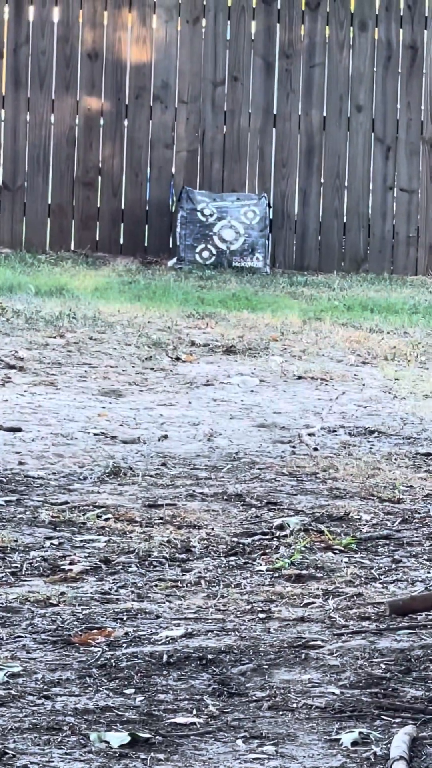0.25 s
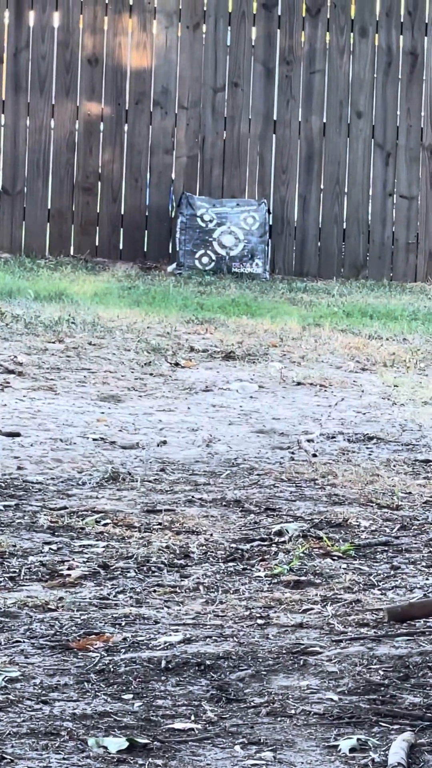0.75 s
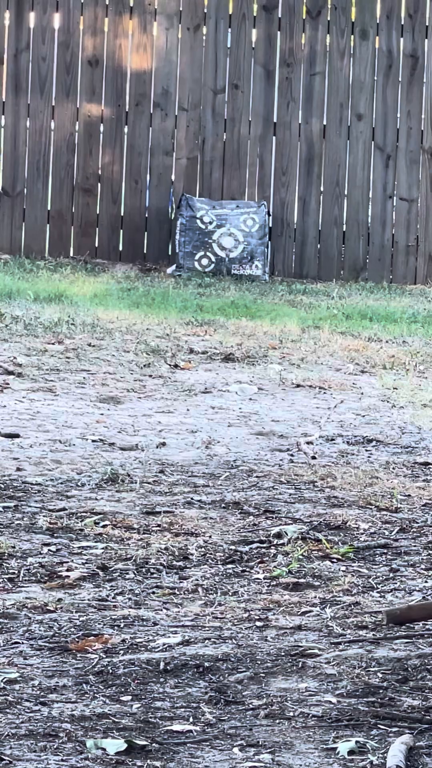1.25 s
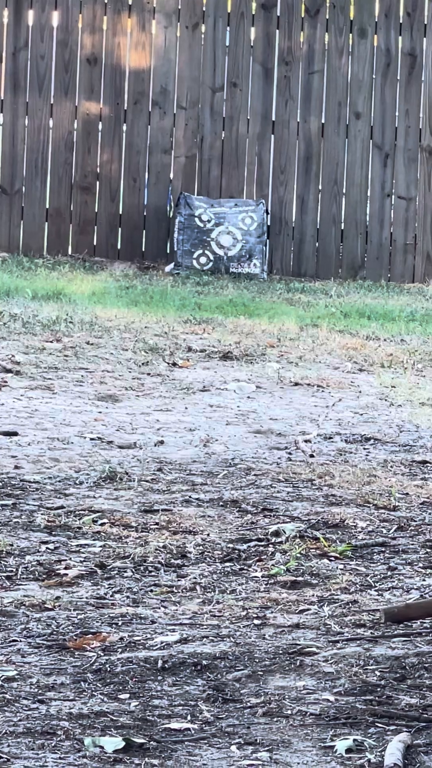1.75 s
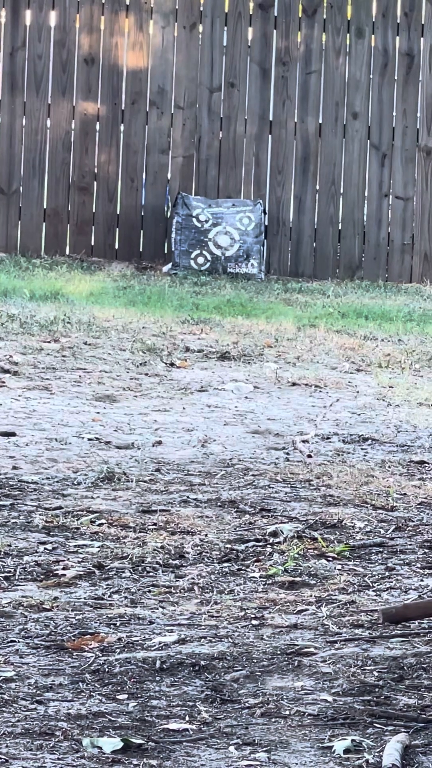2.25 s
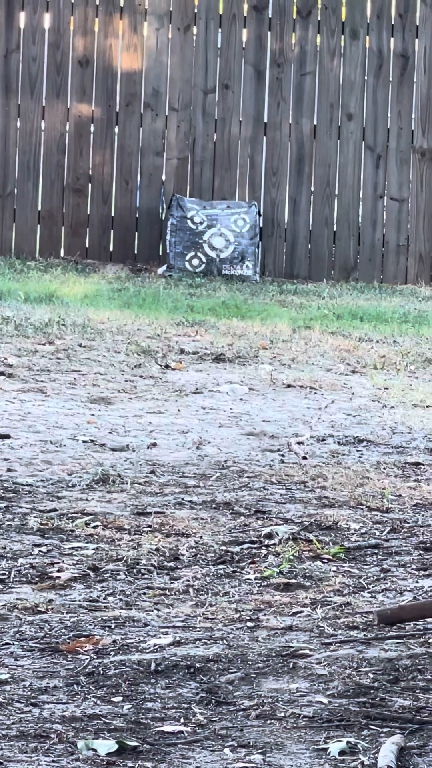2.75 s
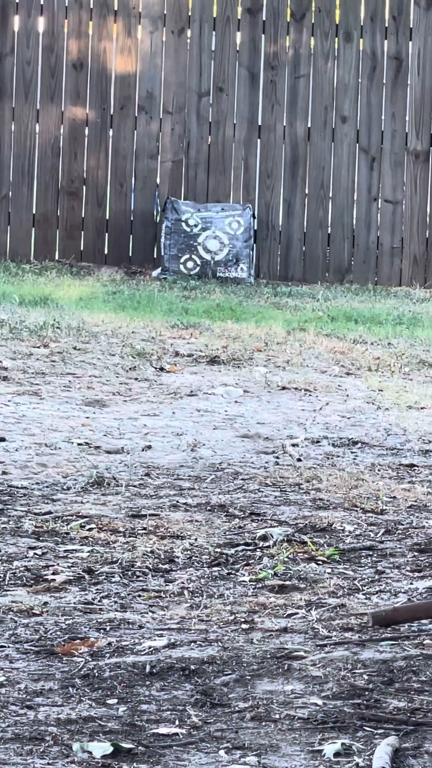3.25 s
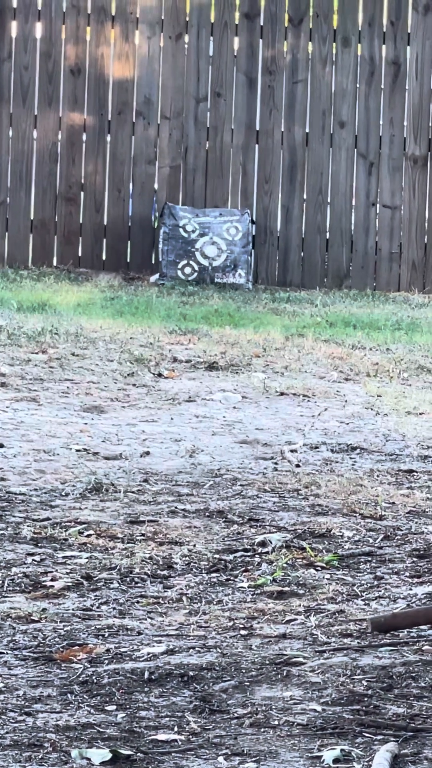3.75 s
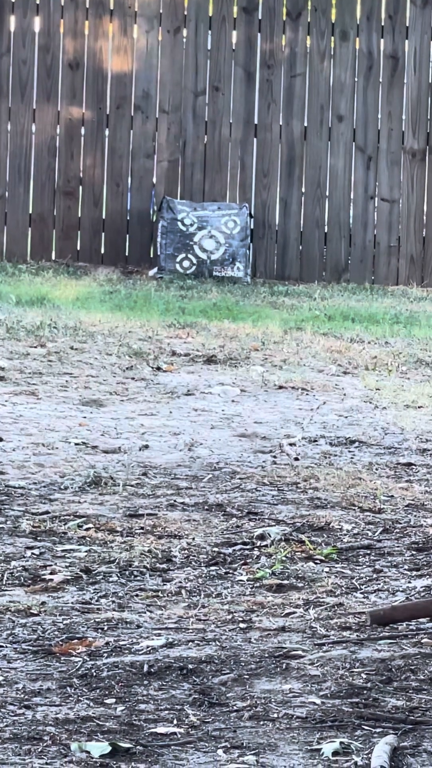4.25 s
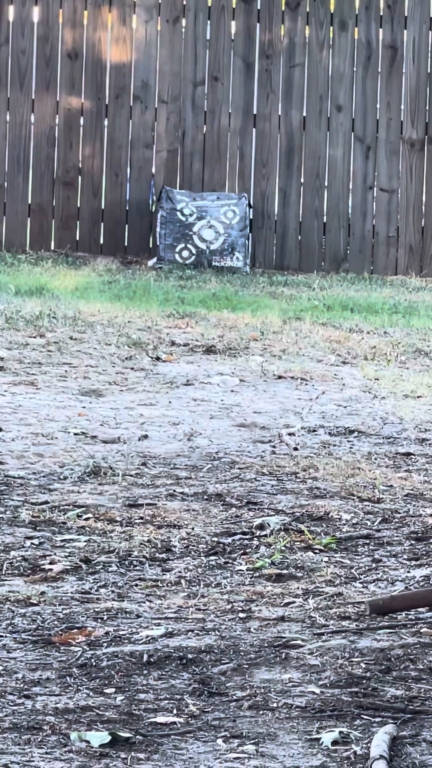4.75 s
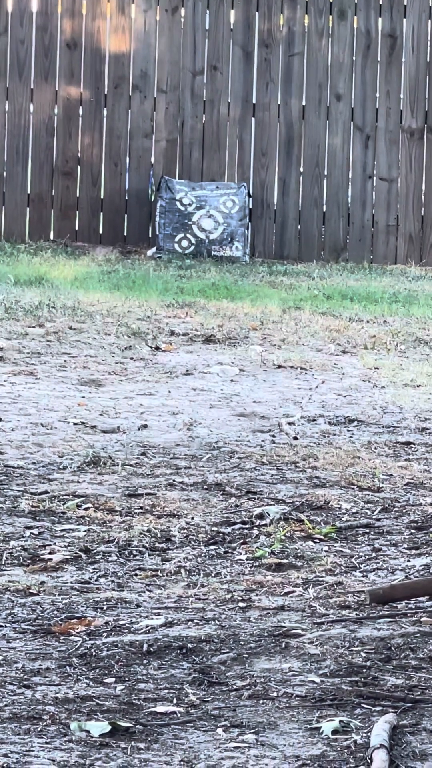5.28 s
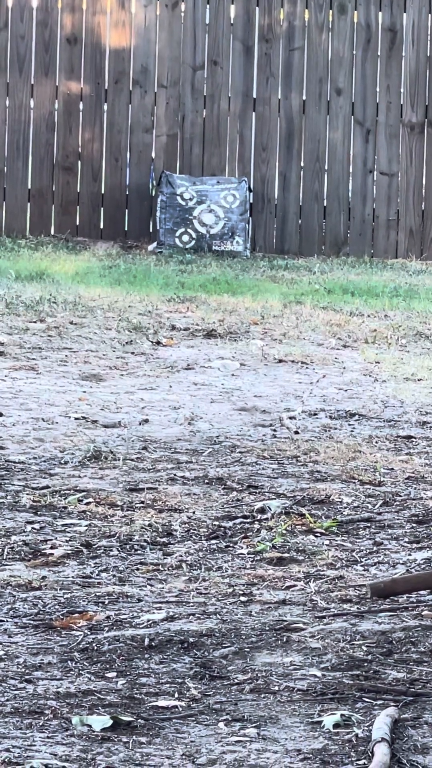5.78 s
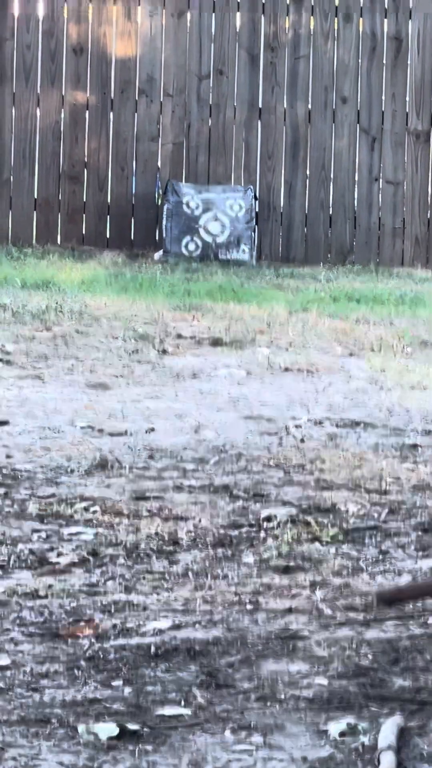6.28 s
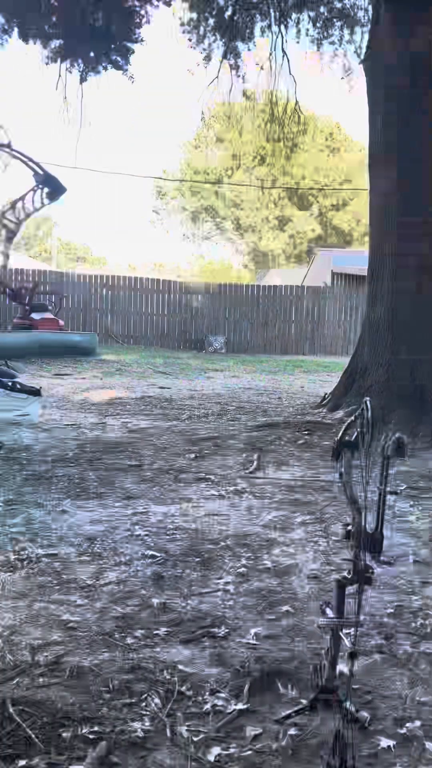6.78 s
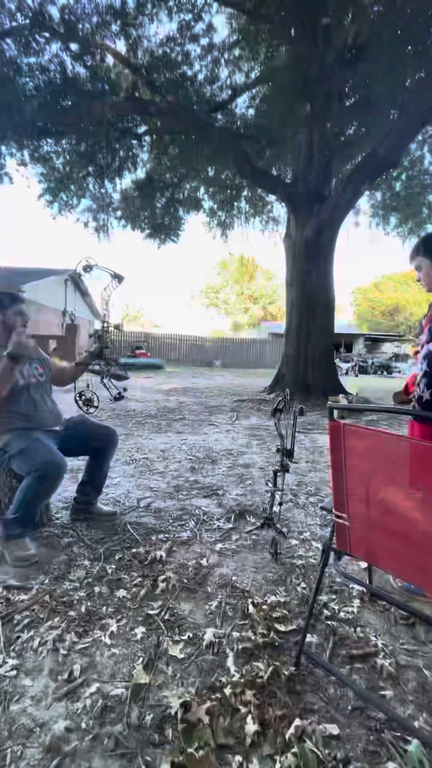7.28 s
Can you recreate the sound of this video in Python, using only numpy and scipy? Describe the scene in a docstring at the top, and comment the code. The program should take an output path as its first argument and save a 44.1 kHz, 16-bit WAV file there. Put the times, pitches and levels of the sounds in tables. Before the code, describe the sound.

Brief, crisp fabric rustles sound close to a phone microphone outdoors, above the low idle of a far engine and a wash of road noise. Midway comes the loudest event: a nearby compound bow cracks, followed almost at once by the arrow's thump in a bag target. Then the engine rises and falls, a twig cracks, fingertips bump the phone, a bird trills very faintly and dry leaves crunch.

```python
"""An eight-cylinder engine rumbles far beyond a back yard, over traffic and faint insects, while clothes
rustle close to the phone. At 3.3 s a compound bow is shot: the release clicks, the string slaps home,
and a quarter second later the arrow thuds into a bag target by a fence. The engine revs once around 5 s.
As it settles a twig snaps, fingertips tap the phone's body, feet shift in dry leaves
and a far bird trills."""
import sys
import numpy as np
from scipy import signal
from scipy.fft import rfft, irfft, next_fast_len
from scipy.io import wavfile
from scipy.ndimage import uniform_filter1d

SR = 44100
rng = np.random.default_rng(int(sys.argv[2]) if len(sys.argv) > 2 else 0)


def file_out(sig):
    """Save sig as 16-bit WAV at sys.argv[1]."""
    # one column per channel
    cols = np.atleast_2d(sig).T
    # limit, then scale
    lim = np.clip(cols, -1, 1)
    pcm = np.round(lim * 32767).astype(np.int16)
    wavfile.write(sys.argv[1], SR, pcm)


N = 331798
TIME = np.arange(N) / SR

# bright tone of rubbing fabric: (frequency [Hz], level [dB])
CLOTH_TONE = [(800, -13), (2000, -5.5), (4000, -11.5), (5000, -13.5), (7000, -7.5), (9000, -1),
              (10300, -1.5), (11300, -6), (12700, -22), (15000, -38.5)]


def undb(db):
    """Decibels to gain."""
    return 10 ** (np.asarray(db) / 20)


def unit(x):
    """Scale to rms 1."""
    return x / np.sqrt(np.mean(x ** 2))


def curves(table):
    """One control curve for each column after the time."""
    s, *columns = np.transpose(table)
    return [np.interp(TIME, s, c) for c in columns]


def gain_at(hz, spectrum):
    """Gain of a (frequency [Hz], level [dB]) spectrum at given frequencies."""
    f, db = np.transpose(spectrum)
    return undb(np.interp(np.log(hz + 1), np.log(f), db))


def colour(x, spectrum):
    """Minimum-phase EQ with the given spectrum; keeps the power of white noise."""
    size = 8192
    gain = unit(gain_at(np.fft.rfftfreq(size, 1 / SR), spectrum))
    cepstrum = irfft(np.log(gain))
    fold = 1 + np.sign(np.fft.fftfreq(size))
    return signal.oaconvolve(x, irfft(np.exp(rfft(cepstrum * fold))))[:N]


def filtered(x, order, hz, kind="band"):
    """Band-, low- or high-pass filter."""
    return signal.sosfilt(signal.butter(order, hz, kind, fs=SR, output="sos"), x)


def noise():
    """White noise."""
    return rng.standard_normal(N)


def walk(rate):
    """Smooth random wander of rms 1, with rate new values a second."""
    k = int(SR / rate)
    steps = np.repeat(rng.standard_normal(N // k + 1), k)
    return unit(uniform_filter1d(uniform_filter1d(steps, k), k)[:N])


def tone(hz):
    """A sine that follows a pitch curve."""
    return np.sin(2 * np.pi * np.cumsum(hz) / SR)


def impulse(s):
    """One instantaneous push at time s."""
    return np.bincount([int(s * SR)], minlength=N).astype(float)


def fade(s, t60):
    """Exponential decay that starts at time s."""
    return (TIME >= s) * undb(-60 * np.clip((TIME - s) / t60, 0, 4))


def delay(x, s):
    """The same sound s seconds later."""
    return np.r_[np.zeros(int(s * SR)), x][:N]


def ring(s, modes):
    """Damped modes struck at time s; neighbours swing in opposite directions."""
    return sum((-1) ** k * undb(db) * fade(s, t60) * np.sin(2 * np.pi * hz * (TIME - s))
               for k, (hz, db, t60) in enumerate(modes))


def spread(mid, side, width):
    """Mid and side to stereo; the microphone ports differ most in the midrange."""
    side = filtered(side, 2, [600, 1500]) + 0.34 * side
    return mid + width * side * np.array([[1], [-1]])


def engine(waver=.005, flutter_db=1.75, burble_db=-7, burble_flutter_db=3, rough_db=-1):
    """Orders of the engine cycle beat against each other over a rough exhaust rumble."""
    # idle and one rev: (time [s], cycle rate [Hz], 5th order [dB], firing 8th [dB], 10th order [dB])
    running = [(0, 9.65, -44, -30, -48), (.3, 9.74, -41, -35, -35), (.6, 9.89, -43, -35, -34),
               (.85, 10.05, -37, -31, -30), (1.15, 10.19, -37, -30, -26), (1.5, 10.11, -39, -28, -26),
               (1.8, 10.02, -38, -28, -33), (2.1, 9.79, -40, -33, -34), (2.35, 9.5, -45, -37, -40),
               (2.6, 9.18, -44, -28, -48), (2.85, 9.28, -46, -30, -44), (3.1, 9.6, -41, -32, -41),
               (3.45, 9.6, -42, -42, -36), (3.8, 9.65, -40, -39, -42), (4.55, 9.65, -38, -43, -38),
               (4.68, 12.72, -30, -35, -33), (4.8, 15.3, -33, -21, -36), (4.95, 16.58, -36, -19, -43),
               (5.12, 17.12, -36, -22, -42), (5.4, 16.92, -36, -20, -41), (5.6, 16.72, -35, -20, -41),
               (5.78, 16.37, -34, -19, -48), (5.95, 15.14, -46, -26, -48), (6.1, 14.45, -41, -27, -40),
               (6.28, 13.9, -48, -28, -40), (6.45, 12.11, -42, -37, -50), (6.7, 10.7, -54, -48, -43),
               (7.05, 9.87, -51, -57, -54), (7.5, 9.57, -54, -66, -63)]
    # weaker orders from each bank's uneven firing: (multiple of the cycle rate, level [dB])
    uneven_orders = [(3, 2), (6, -5.5), (7, -2), (9, -6.5), (11, -5.5), (12, -4), (13, -0.5), (14, -2),
                     (15, -4), (16, 1), (18, -5.5), (19, -5.5), (21, -7), (24, -6)]
    # what the exhaust and the distance let through: (frequency [Hz], level [dB])
    exhaust = [(20, -30), (35, -17), (48, -4), (75, 1), (110, 2), (140, -0.5), (170, -10.5), (240, -13),
               (300, -24), (450, -45), (2000, -110)]
    # swell of the exhaust rumble: (time [s], level [dB])
    rumble_envelope = [(0, -38), (1.2, -35.5), (2.3, -34.5), (3.3, -35), (4.5, -38), (4.75, -29),
                       (5.1, -31.5), (5.8, -33.5), (6.3, -34.5), (6.6, -40.5), (7.1, -44.5), (7.52, -54.5)]
    rate, fifth_db, firing_db, tenth_db = curves(running)
    rumble_db, = curves(rumble_envelope)
    turn = 2 * np.pi * np.cumsum(rate * (1 + waver * walk(12))) / SR
    order = lambda k: np.sqrt(2) * np.sin(k * turn + rng.uniform(0, 2 * np.pi))
    strong = [(5, fifth_db), (8, firing_db), (10, tenth_db)]
    drone = sum(order(k) * undb(db + flutter_db * walk(9)) for k, db in strong)
    burble = sum(order(k) * gain_at(k * rate, exhaust) * undb(db + burble_flutter_db * walk(7))
                 for k, db in uneven_orders)
    roughness = undb(rough_db) * colour(noise(), exhaust)
    return drone + undb(rumble_db) * (undb(burble_db) * burble + roughness)


def traffic(swell_db=0.76, whine_hz=850, whine_db=-12, whine_swell_db=3):
    """A wash of far road noise with a wandering tyre whine."""
    # tone of the distant road: (frequency [Hz], level [dB])
    road_tone = [(100, -12.5), (235, 2), (300, -6.5), (370, -4.5), (470, -6), (680, -5), (850, -3),
                 (1150, -8), (1900, -10.5), (2400, -18), (3200, -24.5), (6000, -35), (10300, -38),
                 (12500, -59)]
    # its slow ebb: (time [s], level [dB])
    road_envelope = [(0, -46), (1, -47), (2, -47), (2.8, -49), (3.8, -51.5), (4.5, -51), (5, -48.5),
                     (5.8, -52), (6.4, -52.5), (7, -53.5), (7.52, -54)]
    level_db, = curves(road_envelope)
    wash = spread(colour(noise(), road_tone), colour(noise(), road_tone), width=.38)
    whine = walk(110) * tone(whine_hz * (1 + .04 * walk(2)))
    whine *= undb(whine_db + whine_swell_db * walk(3))
    return undb(level_db + swell_db * walk(6)) * (wash + whine)


def bass_width(db=-57):
    """A faint low rumble, opposite in left and right, that widens the engine."""
    return undb(db) * unit(filtered(noise(), 2, [30, 130])) * np.array([[1], [-1]])


def insects(insect_hz=2620, insect_db=-68, pulse_db=2):
    """A faint far chorus, one narrow band that comes and goes."""
    chorus = walk(420) * tone(insect_hz * (1 + .015 * walk(1.4)))
    presence_db, = curves([(0, -11), (1.8, -3), (3, 1), (4.6, 0.5), (5.8, -3), (6.4, -13.5)])
    return chorus * undb(insect_db + presence_db + pulse_db * walk(8))


def crackle(spectrum, grain_db):
    """Friction as dense tiny slips of very unequal size, 16 samples each."""
    slips = undb(grain_db * np.minimum(rng.exponential(size=N), 5))
    return unit(colour(noise() * np.repeat(slips, 16)[:N], spectrum))


def clothes():
    """Fabric brushes in short strokes, before the shot and after it."""
    # two bouts of movement, each a list of (time [s], level [dB])
    bouts = [
        [(0.4, -80), (0.58, -70), (0.69, -50.5), (0.77, -67), (0.93, -53), (1.11, -71), (1.13, -51.5),
         (1.28, -61), (1.31, -48), (1.32, -58), (1.33, -49), (1.35, -55), (1.39, -52), (1.41, -49), (1.42, -55),
         (1.44, -52), (1.64, -75), (1.7, -54), (1.8, -76), (2.05, -79), (2.15, -62.5), (2.32, -84), (2.41, -45),
         (2.47, -50.5), (2.47, -43.5), (2.49, -54.5), (2.55, -61), (2.56, -50), (2.57, -63), (2.85, -82)],
        [(4.8, -86), (4.814, -84), (5.062, -53.5), (5.088, -39.5), (5.22, -65.5), (5.464, -73.5),
         (5.522, -54.5), (5.604, -50), (5.626, -63), (5.634, -51), (5.642, -57), (5.762, -46.5), (5.848, -67),
         (5.894, -60.5), (5.976, -76.5), (6.032, -57), (6.1, -84), (6.15, -83)],
    ]
    strokes = sum(undb(curves(rows)[0]) * (TIME > rows[0][0]) * (TIME < rows[-1][0]) for rows in bouts)
    return strokes * crackle(CLOTH_TONE, grain_db=3.8)


def ticks(trim_db=-2):
    """Single sharp snaps among the rustle."""
    # tiny noise bursts: (time [s], level [dB], band centre [Hz], t60 [s])
    snaps = [(.9986, -42, 10000, .012), (1.1253, -44, 10000, .03), (1.284, -45, 9000, .015),
             (1.2967, -37, 9000, .06), (1.334, -32, 9000, .025), (1.3623, -35, 10000, .02),
             (1.3728, -34, 10000, .03), (1.3882, -31.5, 9000, .02), (1.421, -31, 9000, .015),
             (2.4094, -38, 10000, .03), (2.4304, -38, 10000, .03), (2.4733, -32, 9000, .012),
             (2.5551, -32.5, 8000, 0.013), (4.241, -49, 7000, .015), (5.0845, -40.5, 10000, .025),
             (5.6341, -39, 9000, .012)]
    bursts = sum(undb(db) * filtered(noise() * fade(s, t60), 1, [hz / 2, hz * 1.4])
                 for s, db, hz, t60 in snaps)
    return undb(trim_db) * colour(bursts, CLOTH_TONE)


def bow(click_db=-12, chatter_db=-25, hook_db=-27, clack_db=-29, limb_db=-29, buzz_db=-26.5):
    """The release snaps open; the string drives the arrow off, slaps its stop and shakes the limbs."""
    # tone of the release click and of the string slap: (frequency [Hz], level [dB])
    click_tone = [(1000, -25), (3000, -22), (4500, -12), (6000, -6), (7500, -5), (8300, 0), (9700, 1),
                  (11300, 2), (13000, -21), (15500, -23)]
    slap_tone = [(300, 1), (700, -11.5), (1200, -8.5), (1900, -8), (2500, -18), (3400, -10), (4400, -7),
                 (6000, -11.5), (7800, -6), (9000, 0.5), (10200, -1.5), (11500, -7.5), (13000, -20),
                 (15500, -34)]
    # the string hits its stop: (time [s], level [dB], t60 [s])
    blows = [(3.3113, -28, .04), (3.3149, -16.5, .03), (3.3176, -20, .055)]
    # ring of release hook, riser and fittings, limbs and string: (frequency [Hz], level [dB], t60 [s])
    hook_modes = [(5879, -12, .029), (7000, -11, .02), (7330, -2, .03), (7740, 12, .03), (7967, -6, .036),
                  (11390, -8, .025)]
    riser_modes = [(716, -3, .16), (1220, -6, .05), (1600, -2, .05), (1950, 0, .07), (2850, -5, .08),
                   (3250, -3, .05), (4300, -4, .04), (5250, -10, .09), (6320, -12, 0.1198),
                   (10372, -11, .2)]
    limb_modes = [(90, 0, .3), (175, -4, .18), (291, -6, .3), (384, -2, .17)]
    # slapback from walls near the archer: (delay [s], level [dB])
    walls = [(0.0166, -21.5), (0.0297, -16), (.107, -28)]
    # tone of the yard's tail and of the rattling fittings: (frequency [Hz], level [dB])
    tail_tone = [(120, -15), (300, 6), (600, 0), (1500, -2), (3500, -3), (6300, 0), (9000, -1),
                 (10500, 2.5), (12000, -9), (14000, -24), (16000, -36)]
    buzz_tone = [(150, -10), (350, -2), (850, -6), (1800, -2), (4000, -7), (9000, -22), (15000, -45.5)]
    click_envelope = undb(click_db) * fade(3.2932, .005) + undb(chatter_db) * fade(3.2955, .035)
    click = colour(noise() * click_envelope, click_tone)
    hook = undb(hook_db) * ring(3.2925, hook_modes)
    slap = colour(noise() * sum(undb(db) * fade(s, t60) for s, db, t60 in blows), slap_tone)
    clack = undb(clack_db) * ring(3.3178, riser_modes)
    # the string swings at 150 Hz and rattles the fittings once a cycle
    swing = 1 + 0.54 * np.cos(2 * np.pi * 150 * (TIME - 3.319))
    buzz = undb(buzz_db) * colour(noise() * swing * fade(3.316, .11), buzz_tone)
    # the heavy limbs take a moment to start swinging
    limbs = undb(limb_db) * ring(3.322, limb_modes) * (1 - fade(3.322, .025))
    shot = click + slap + buzz + clack + limbs
    echoes = sum(undb(db) * delay(shot, s) for s, db in walls)
    tail = yard(3.318, tail_tone, t60=0.57, treble_t60=.36, db=-35)
    # the bow stands beside the phone, so the ports hear it a little differently
    return spread(shot, delay(shot, 0.00095), width=.15) + hook + echoes + tail


def yard(s, spectrum, t60, treble_t60, db):
    """Diffuse scatter from fence, trees and ground after a blow at time s; the treble dies sooner."""
    tails = []
    for _ in range(2):
        grain = noise()
        low = filtered(grain, 3, 7000, "low") * fade(s, t60)
        high = filtered(grain, 3, 7000, "high") * fade(s, treble_t60)
        attack = 1 - fade(s, .03)
        tails.append(colour((low + high) * attack, spectrum))
    return undb(db) * spread(*tails, width=.35)


def target(snap_db=3, tear_db=-19, bag_db=-24):
    """The arrow snaps through the cover and tears into the filling; the thump echoes off the fence."""
    # body of the bag: (frequency [Hz], level [dB], t60 [s])
    bag_modes = [(103, -1, 0.25), (231.6, -4, 0.25), (300, 2, 0.046), (375, -1, .035), (640, -8.5, .025)]
    # tone of the puncture, and of the yard's tails after puncture and thump: (frequency [Hz], level [dB])
    puncture_tone = [(700, -1), (1150, -19), (1900, -5.5), (2600, -7), (3600, -3.5), (4900, -6), (6000, -7),
                     (7500, -5), (9000, -2), (10400, -5.5), (11400, -25), (12800, -43.5), (15500, -44)]
    bright_scatter = [(300, -6), (700, 1.5), (1200, -0.5), (2200, 0), (4000, -5.5), (7500, -3), (10300, -4),
                      (12000, -18), (14000, -40)]
    dark_scatter = [(50, -21), (110, -1), (240, 1), (350, -9.5), (550, -24), (1500, -55), (4000, -90)]
    snap = undb(snap_db) * impulse(3.5746)
    tear = undb(tear_db) * noise() * fade(3.5746, .012)
    thump = undb(bag_db) * ring(3.5758, bag_modes)
    fence_echo = undb(bag_db) * ring(3.5818, bag_modes)
    bright_tail = yard(3.576, bright_scatter, t60=0.51, treble_t60=0.35, db=-40.5)
    dark_tail = yard(3.58, dark_scatter, t60=.42, treble_t60=.2, db=-29)
    return colour(snap + tear, puncture_tone) + thump + fence_echo + bright_tail + dark_tail


def twig(s=5.8905, wood_db=-39.5, crack_db=-42):
    """A dry twig gives way underfoot: a crack and a short woody ring."""
    # ring of the wood: (frequency [Hz], level [dB], t60 [s])
    wood_modes = [(720, -1, .04), (950, 0, .035), (1170, 0, .03), (2480, -3, 0.022), (3230, -3, 0.016),
                  (3870, -9, 0.015), (5580, -14, .015)]
    crack_tone = [(350, -8), (700, 3), (1150, 3), (1700, -5), (3600, -2), (6000, -16), (12000, -36)]
    crack = colour(noise() * fade(s, .03), crack_tone)
    return undb(wood_db) * ring(s, wood_modes) + undb(crack_db) * crack


def taps(dispersion=0.191, rebound_db=-17):
    """Bending waves in the phone's body: the higher ones travel faster, so each tap chirps down."""
    # fingertips land: (time [s], peak level [dB], hardness [factor on the pitch])
    touches = [(6.254, -36.5, 0.92), (6.2611, -24.5, 0.95), (6.5619, -27, 0.99), (6.612, -40, 1.05),
               (6.631, -36.5, 1.2), (6.6865, -40, 1.1), (6.73, -17.5, 1), (6.943, -37, 1.03),
               (6.961, -26.5, 0.96)]
    # tone of a soft fingertip on the case: (frequency [Hz], level [dB])
    tap_tone = [(100, -51), (250, -17), (370, -5), (500, 0.5), (650, -1.5), (820, -11.5), (1200, -20.5),
                (1800, -36.5), (4000, -81)]
    hz = np.fft.rfftfreq(2048, 1 / SR)
    # the travel time goes as one over the root of the frequency
    travel = np.exp(-4j * np.pi * dispersion * np.sqrt(hz))
    knocks = np.zeros(N)
    for s, db, hardness in touches:
        wave = irfft(gain_at(hz / hardness, tap_tone) * travel)
        crest_s = np.argmax(np.abs(signal.hilbert(wave))) / SR
        knocks += undb(db) * signal.oaconvolve(impulse(s - crest_s), wave / np.abs(wave).max())[:N]
    return knocks + undb(rebound_db) * delay(knocks, .0052)


def leaves():
    """Feet shift in dry leaves: a wide, grainy crunch."""
    # the shuffle: (time [s], level [dB])
    shuffle = [(6.3, -83), (6.4, -64), (6.7, -77), (7.08, -71), (7.17, -49), (7.3, -50), (7.38, -54),
               (7.45, -63), (7.52, -64.5)]
    # tone of dry leaves: (frequency [Hz], level [dB])
    leaf_tone = [(250, -7), (500, -1.5), (1000, -7), (1900, -12), (2700, -10), (4000, -14.5), (6000, -13),
                 (8500, -10.5), (10500, -8), (11700, -16.5), (13000, -34.5), (15000, -55)]
    level_db, = curves(shuffle)
    crunch = spread(crackle(leaf_tone, grain_db=2), crackle(leaf_tone, grain_db=-0.5), width=1.1)
    return undb(level_db) * crunch


def bird(trill_hz=42, trill_depth=.5, waver=.008, rough=.6):
    """A thin, pulsing note that sinks slightly; scatter through the leaves roughens it."""
    # one far trill: (time [s], pitch [Hz], level [dB])
    call = [(6.35, 3320, -93), (6.39, 3290, -64), (6.46, 3250, -62), (6.54, 3190, -68), (6.66, 3130, -71),
            (6.78, 3060, -90)]
    hz, db = curves(call)
    pulse = (1 + trill_depth * np.sin(2 * np.pi * trill_hz * TIME)) * (1 + rough * walk(180))
    singing = (TIME > call[0][0]) * (TIME < call[-1][0])
    return singing * undb(db) * pulse * tone(hz * (1 + waver * walk(150)))


def scene():
    """Everything that reaches the phone, in stereo."""
    bed = engine() + traffic() + bass_width() + insects()
    return bed + clothes() + ticks() + bow() + target() + twig() + taps() + leaves() + bird()


def record(dry, top_hz=15700):
    """The two microphone ports hear the treble out of step; a steep low-pass cuts the top."""
    # how far the left port leads the right: (frequency [Hz], phase [rad])
    port_phase = [(0, 0), (600, 0.2), (1200, -0.14), (1900, -2), (2600, 1.05), (4200, 0.35), (4800, 3),
                  (5400, 6.5), (6100, 6), (8500, 9.5), (9500, 9.5), (11800, 13.5), (16000, 13.5)]
    size = next_fast_len(N + SR)
    lead = np.interp(np.fft.rfftfreq(size, 1 / SR), *np.transpose(port_phase))
    shift = np.exp(.5j * lead * np.array([[1], [-1]]))
    ports = irfft(rfft(dry, size) * shift, size)[:, :N]
    return signal.sosfilt(signal.ellip(8, .2, 70, top_hz, fs=SR, output="sos"), ports)


dry = scene()
out = record(dry)
file_out(out)
```